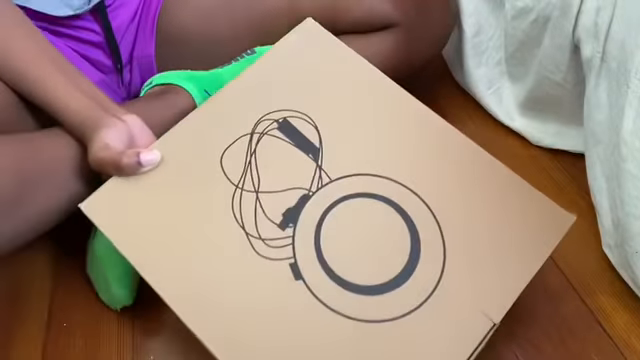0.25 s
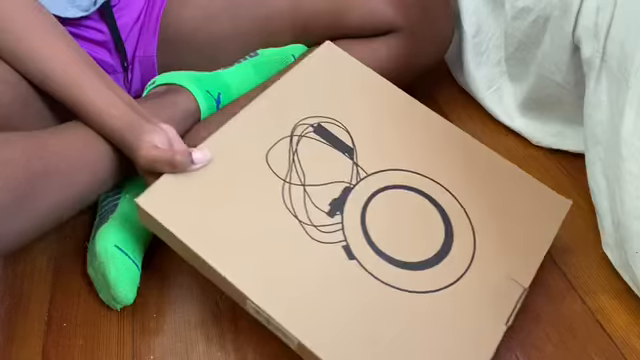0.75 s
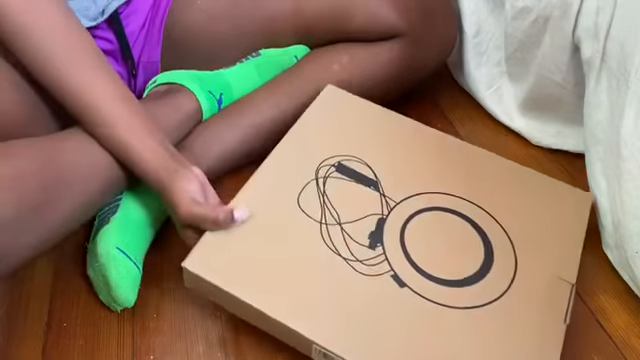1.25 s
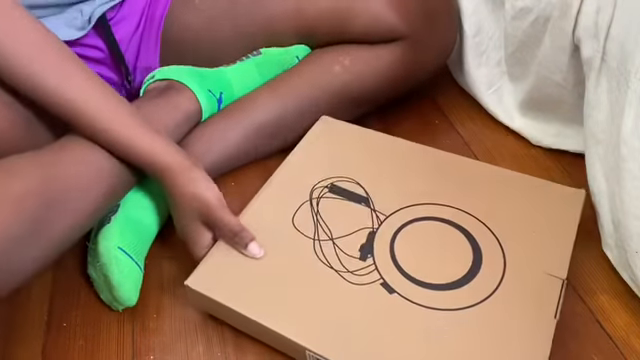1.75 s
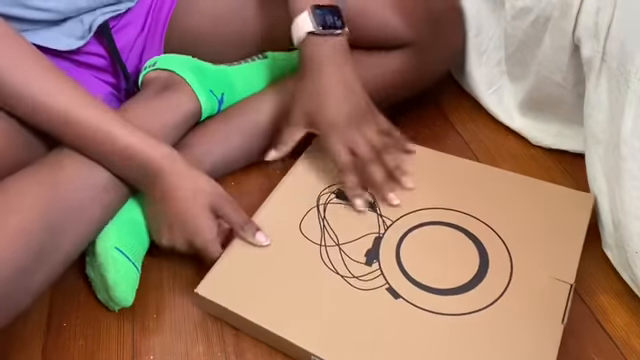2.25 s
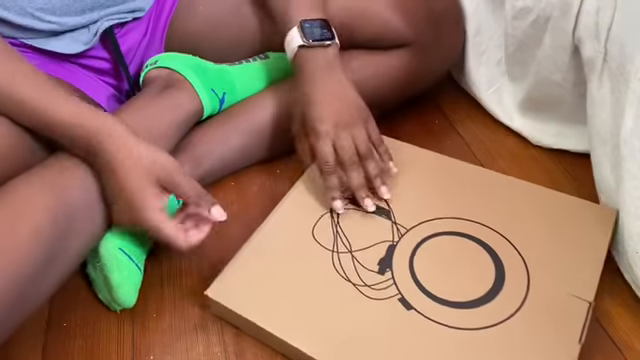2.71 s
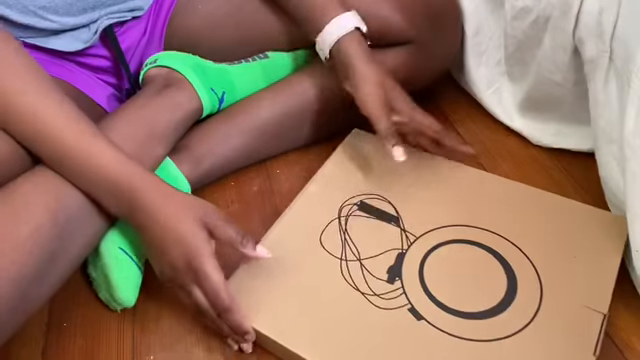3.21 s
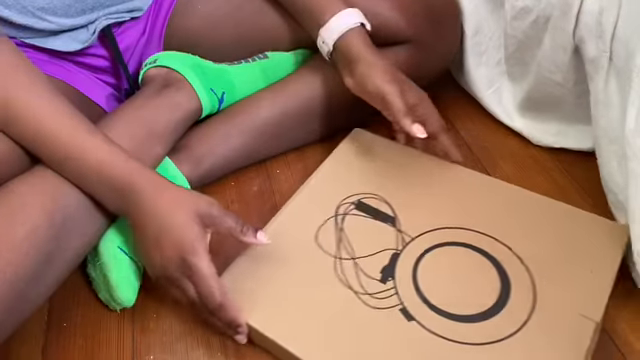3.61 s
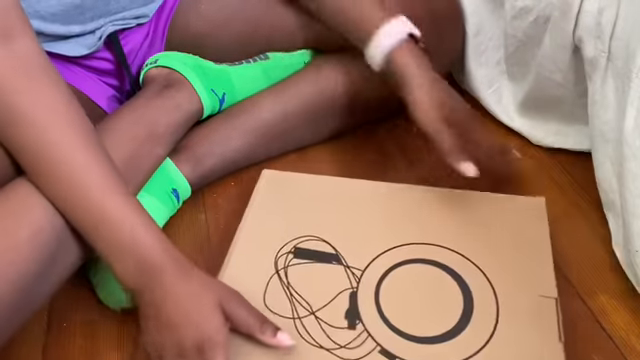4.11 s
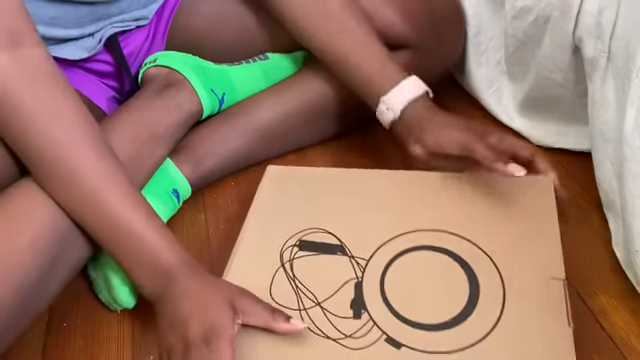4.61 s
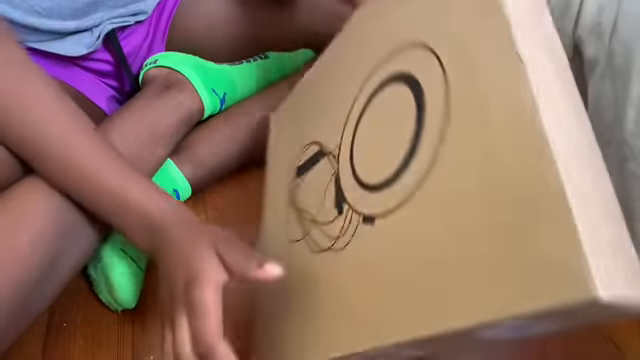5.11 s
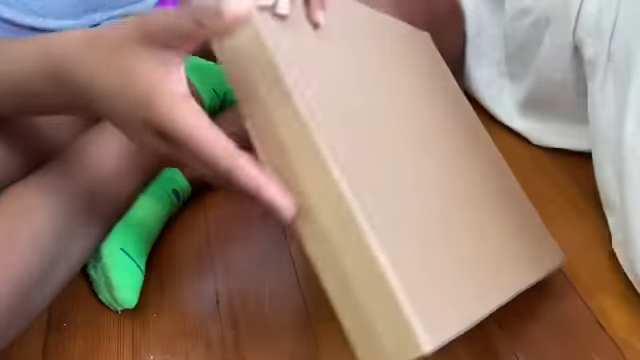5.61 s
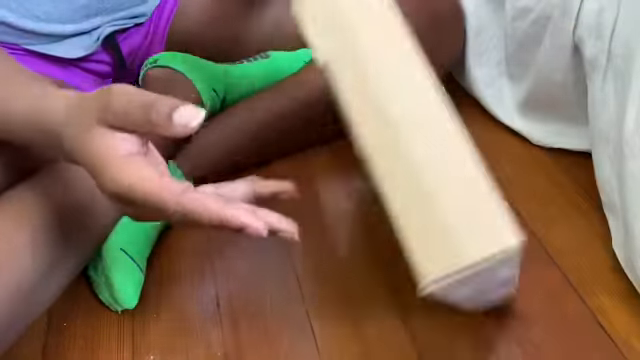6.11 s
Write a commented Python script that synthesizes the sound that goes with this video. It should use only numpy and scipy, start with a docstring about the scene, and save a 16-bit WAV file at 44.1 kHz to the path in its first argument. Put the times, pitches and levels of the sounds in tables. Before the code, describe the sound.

A flat cardboard box bumps down onto a wooden floor, scrapes, slams, gets stroked and pushed round, then tips up with a hard knock.

```python
"""In a small furnished room, a flat cardboard box is lowered onto a wooden floor with dull bumps of its contents.
It is eased along the boards with a scrape, slams down, is stroked in short rubs, then pushed round.
Tipped up on its edge, it knocks, grates and is caught by its rim; last come small rubs and nail ticks.
Ringing modes make the blows, random catches of fibre the rubbing; two microphone ports hear both, with echoes."""
import sys
import numpy as np
from scipy import signal
from scipy.fft import rfft, irfft, next_fast_len
from scipy.io import wavfile
from scipy.ndimage import uniform_filter1d, map_coordinates

SR = 44100
rng = np.random.default_rng(int(sys.argv[2]) if len(sys.argv) > 2 else 0)


def int16_out(signal):
    """Quantize to a 16-bit WAV file."""
    q = np.round(np.clip(np.atleast_2d(signal).T, -1, 1) * 32767)
    wavfile.write(sys.argv[1], SR, q.astype(np.int16))


N = 280035  # samples
BLOW_T = np.arange(SR // 2) / SR  # time axis of one blow, s

# Blow levels are relative: the strongest 10 ms of each.
# dull bumps of contents, palms and floor: t/s, level/dB, relative softness corner f/Hz
THUMPS = [(0.028, -27.5, 168), (0.065, -26, 166), (0.193, -8.5, 194), (0.214, -16.5, 119),
          (0.331, -27, 262), (0.424, -30, 84), (0.5, -19, 114), (0.688, -11.5, 259), (0.701, -11.5, 157),
          (0.712, -13.5, 174), (0.736, -21, 172), (0.772, -19, 154), (0.86, -20, 130), (1.575, -31, 102),
          (1.684, -38.5, 159), (2.078, -41, 287), (2.134, -15, 346), (2.184, -24, 107), (2.356, -30, 360),
          (3.045, -23, 257), (3.537, -27.5, 192), (4.091, -33, 270), (4.178, -26, 233), (4.25, -27, 202),
          (4.265, -21, 158), (4.376, -31, 260), (4.414, -40, 200), (4.511, -25.5, 219), (4.556, -26.5, 202),
          (4.597, -29.5, 168), (4.747, -26, 128), (4.94, -27.5, 156), (5.015, -37, 222), (5.173, -22, 113),
          (5.253, -28.5, 196), (5.582, -25, 175), (6.258, -33.5, 91)]
# edges meeting the floor or a hand: t/s, level/dB, hardness f/Hz, skid/s
KNOCKS = [(0.196, -23, 397, 0.025), (0.502, -34.5, 960, 0.013), (0.649, -33, 524, 0.021),
          (0.686, -24.5, 1290, 0.0036), (0.7, -25, 1190, 0.0095), (0.714, -29.5, 1000, 0.013),
          (0.7705, -29.5, 1290, 0.0013), (0.842, -42, 1090, 0.0018), (0.858, -25.5, 1360, 0.0012),
          (0.866, -23.5, 685, 0.014), (0.876, -33.5, 890, 0.015), (0.991, -36, 760, 0.0036),
          (1.196, -38.5, 1020, 0.0075), (1.263, -35, 870, 0.001), (1.573, -36, 930, 0.016),
          (1.592, -37, 830, 0.012), (1.683, -37, 860, 0.0018), (2.352, -37.5, 945, 0.0017),
          (2.394, -30, 1010, 0.00051), (2.416, -34, 1280, 0.0076), (2.523, -36.5, 854, 0.0041),
          (2.541, -34.5, 1525, 0.005), (2.712, -36, 1190, 0.0073), (2.748, -31, 1493, 0.0024),
          (2.758, -33.5, 1280, 0.0096), (3.044, -31.5, 800, 0.0079), (3.53, -24.5, 680, 0.0013),
          (3.718, -31, 1160, 0.027), (3.96, -33.5, 760, 0.012), (3.999, -38.5, 990, .006),
          (4.158, -35, 670, 0.0061), (4.176, -43, 905, 0.0074), (4.292, -40.5, 1190, 0.0018),
          (4.369, -36, 830, 0.0075), (4.591, -31, 1360, 0.0012), (4.72, -27.5, 600, 0.0099),
          (4.8, -36, 1800, 0.0015), (4.851, -32, 1340, 0.015), (4.885, -37, 1160, 0.028),
          (5.051, -32.5, 1250, 0.0086), (5.104, -35.5, 1510, .002), (5.474, -40.5, 970, 0.0067),
          (6.165, -47.5, 1900, 0.011), (6.236, -36, 1170, 0.038), (6.311, -50, 1050, 0.0076)]
# the box landing with its whole weight: t/s, level/dB, point of contact, skid/s
SLAMS = [(2.0785, -21.5, "base", 0.002), (2.079, -15.5, "edge", 0.0018), (2.086, -14.5, "edge", 0.014),
         (2.1336, -5.5, "base", 0.0037), (2.139, -15.5, "base", 0.0031), (2.149, -22.5, "base", 0.0076),
         (5.136, -24.5, "side", 0.0066), (5.1409, -10, "corner", 0.005), (5.152, -25, "corner", 0.0143),
         (5.251, -21, "side", 0.0084), (5.275, -24, "corner", 0.0049), (5.2834, -21, "side", 0.0073),
         (5.291, -26, "side", 0.01)]
# fingernails and crisp card edges: t/s, level/dB, ring f/Hz, ring against crack/dB
TICKS = [(0.023, -32.5, 3200, -21), (0.064, -32, 3395, -26), (0.191, -32, 3290, -15.5),
         (0.33, -30, 3300, -12.5), (0.683, -39, 3560, 2), (0.77, -36, 3700, -6), (0.858, -39, 3000, -1),
         (2.089, -32.5, 5730, -14), (2.353, -35, 3400, -2), (2.747, -37, 4000, -18.5),
         (4.366, -38.5, 8350, -9), (4.403, -42.5, 8600, -1), (5.142, -29, 7160, -4.5),
         (5.247, -28.5, 7940, -7), (5.254, -32, 5400, -3), (5.707, -32.5, 7400, -5),
         (6.102, -29.5, 4930, 3.5), (6.159, -34, 7000, -20), (6.194, -41, 4600, -14),
         (6.237, -39.5, 4640, -3.5)]
# fingertips catching the upright box by its rim: t/s, level/dB
RIM_CATCHES = [(5.58, -28), (5.707, -32), (6.028, -40)]
# modes of the rim: f/Hz, level/dB, t60/s
RIM_MODES = [(810, -6, 0.11), (1766, 8, 0.028), (1964, -7, 0.068), (2970, -1, 0.031)]
# modes of the box's hollow and panels: f/Hz
BOX_HZ = [72, 119, 175, 238, 285, 393, 490, 700, 862, 985, 1141, 1233, 1450, 1710, 1845, 2140, 2558, 3134,
          3600, 4000]
# width of each mode at its usual loss: width/Hz
BOX_WIDTH_HZ = [10.8, 26, 24.3, 50, 81, 55, 95, 68, 45, 71, 66, 34, 142, 77, 91, 94, 60, 260, 180, 270]
# how strongly each mode sounds, by point of contact: level/dB
BOX_MODE_DB = { "lid": [-2, -2, 1, 3.5, 2.5, 7.5, 3, 9, -4, 5.5, -1.5, 6, -1.5, 2.5, 1.5, 8, 4.5, 1, 6.5,
               -14.5], "edge": [-17.5, -2.5, -13.5, -2.5, 1.5, -7.5, -3.5, -1, 2, -3, 2.5, -5, -8.5, 4, 4.5,
               1.5, 0, -11, -8.5, -18], "base": [1.5, -4, -4.5, -3.5, -4, 2.5, -3, 7, 7, -3, -13.5, 2, -7.5,
               -15, -11, -25.5, -37.5, -36.5, -41, -45], "corner": [-27, -9, -3, -11.5, -14, 0, -7, -3, 0,
               -1, -6.5, 7, 1.5, -4, -3, 5, -4.5, -4, -9.5, -7.5], "side": [-20, -15, -2.5, 1.5, -5.5, -6,
               -14, -2, 4, 4.5, -5.5, 0, -10.5, -7.5, -12.5, -6, -14, -17, -23.5, -15]}

# the box eased onto the floor: t/s, relative scrape of card on wood/dB, relative hiss of skin on card/dB
EASE_SLIDE = [(0.96, -28.5, -46), (1.0, -41.5, -50), (1.17, -46.5, -50), (1.21, -38, -50.5),
              (1.3, -45, -44), (1.37, -40, -46), (1.42, -47.5, -51.5), (1.45, -45.5, -43),
              (1.54, -44, -38.5), (1.62, -45.5, -51.5), (1.89, -46, -49), (2.04, -52, -67)]
# the box pushed round, same columns: t/s, relative scrape/dB, relative hiss/dB
PUSH_SLIDE = [(3.44, -47, -66), (3.56, -38.5, -41.5), (3.675, -30, -31), (3.801, -38.5, -44.5),
              (3.98, -37.5, -42.5), (4.14, -46.5, -52.5), (4.182, -36, -40.5), (4.31, -39, -49.5),
              (4.37, -36.5, -47), (4.43, -44, -57), (4.48, -41, -49.5), (4.55, -35, -43.5),
              (4.66, -39.5, -45.5), (4.703, -35.5, -37), (4.94, -36.5, -42), (5.12, -39.5, -44),
              (5.34, -41.5, -52), (5.46, -60, -62)]
# short rubs as hands shift the box or stroke its lid: start t/s, length/s, scrape level/dB, hiss level/dB
RUBS = [(0.0, 0.0061, -36.5, -47), (0.176, 0.034, -38, -61), (0.322, 0.014, -44, -64),
        (0.421, 0.12, -44, -50.5), (0.513, 0.234, -52, -49.5), (0.638, 0.29, -47, -53),
        (2.221, 0.066, -41, -47), (2.31, 0.28, -37, -42.5), (2.601, 0.17, -39, -47.5),
        (2.896, 0.11, -78, -56.5), (3.03, 0.03, -43.5, -50), (3.148, 0.14, -39, -47.5),
        (3.332, 0.091, -48.5, -86), (5.466, 0.015, -44, -52), (5.475, 0.22, -47, -50.5),
        (5.728, 0.11, -38, -48.5), (5.839, 0.085, -35.5, -46), (5.907, 0.14, -41, -47),
        (6.108, 0.097, -60.5, -56), (6.228, 0.022, -40.5, -39.5), (6.288, 0.028, -43.5, -46.5)]
# palms brushing the lid as it is caught or let go: start t/s, length/s, level/dB
BRUSHES = [(0.01, 0.082, -44), (0.175, 0.019, -34), (0.308, 0.038, -41), (0.668, 0.021, -25.5),
           (0.84, 0.027, -38), (2.056, 0.056, -28), (2.106, 0.034, -38.5), (5.219, 0.024, -31.5),
           (5.26, 0.011, -36), (5.562, 0.019, -33)]
# stick-slip of a dragged edge, shudder to faint squeak: middle t/s, level/dB, half length/s, mean slip rate f/Hz
SLIPS = [(1.995, -54, .065, 1740), (3.945, -31, .02, 60), (4.045, -35, .095, 59)]
# hands taking the weight and bending the panels: start t/s, length/s, relative level/dB
GRIPS = [(0.0, 0.59, -40.5), (0.651, 0.18, -35), (0.829, 0.079, -35), (2.059, 0.19, -37.5),
         (3.908, 0.62, -45.5), (4.913, 0.49, -47), (5.963, 0.22, -54)]

# colour of card scraping on wood: f/Hz, level/dB per Hz
SCRAPE_COLOUR = [(100, -5.5), (220, -4.5), (400, 3.5), (560, -6), (730, 5.5), (1000, -2.5), (1500, -5.5),
                 (2200, -11.5), (4000, -30), (8000, -58)]
# colour of the rasp shared by card and skin: f/Hz, level/dB per Hz
RASP_COLOUR = [(700, -28), (1500, -7.5), (2600, -3.5), (3400, -5), (4400, -4), (6000, -17.5),
               (10000, -67.5)]
# colour of skin hissing on card: f/Hz, level/dB per Hz
HISS_COLOUR = [(1500, -18), (3500, -3), (5500, -1), (8000, 0), (11000, -2.5), (14300, -3), (15100, -22)]
# colour of an edge snagging on the grain: f/Hz, level/dB per Hz
SNAG_COLOUR = [(300, -7.5), (1400, -2.5), (4500, -31), (10000, -42)]
# colour of bending panels: f/Hz, level/dB per Hz
RUMBLE_COLOUR = [(20, -30), (40, 0), (60, -2), (90, 0.5), (180, -11), (300, -15), (600, -40.5)]

# decay of the room's tail: f/Hz, t60/s
ROOM_T60 = [(70, 0.18), (300, 0.2), (1500, 0.18), (5000, 0.18), (14000, 0.015)]
# left-right correlation of scattered sound at the ports: f/Hz, correlation
PORT_LIKENESS = [(80, 0.7), (200, 0.8), (500, 0), (3000, 0)]
# arrival of direct sound at the left port after the right: f/Hz, lag/s
PORT_LAG = [(300, .0001), (2300, .00013), (4500, -.000136), (15000, -.000136)]
# left port minus right: f/Hz, level/dB
PORT_BALANCE = [(150, 0), (400, -4), (1000, -2), (3000, -1.5), (9000, -.5)]

HELD_UNTIL_S, HELD_LOSS = 0.75, 0.6  # held clear of the floor, the box has this share of its usual loss
UPRIGHT_S, TIPPING_S = 5.2, 0.4  # the box starts to stand on its narrow side, and the length of that turn
FIRST_BLOW = 2.3  # a short contact's first blow against its chatter
SWELL_SHARE = 0.31  # swell of a short rub, as a share of its length
RELEASE_DB_PER_S = 246.5  # fall when a hand stops


def box_ring(place, loss=1):
    """The box's answer to one sharp tap at a point of contact; with less loss its modes ring longer."""
    ring = 0
    for k, (hz, width, db) in enumerate(zip(BOX_HZ, BOX_WIDTH_HZ, BOX_MODE_DB[place])):
        decay = np.exp(-np.pi * loss * width * BLOW_T)
        ring = ring + (-1) ** k * amp(db) * width * decay * np.cos(2 * np.pi * hz * BLOW_T)
    return ring


def contact_force(skid):
    """A first blow, then chatter for as long as the contact skids."""
    force = rng.standard_normal(len(BLOW_T)) * np.exp(-(BLOW_T / skid) ** 4)
    force /= np.linalg.norm(force)
    force[0] += FIRST_BLOW * np.exp(-skid / 0.011)  # a short contact is nearly all one blow
    return force


def ring_panels(force, ring):
    """The box's modes, at unit energy, driven by a contact force."""
    return signal.fftconvolve(force, ring / np.linalg.norm(ring))[:len(BLOW_T)]


def slams(crack_db=-13, crack_hz=2800):
    """A heavy landing rings the modes of the part that hits, with a dry crack of card."""
    out = np.zeros((2, N))
    for s, db, place, skid in SLAMS:
        force = contact_force(skid)
        panels = ring_panels(force, box_ring(place))
        crack = amp(crack_db) * filtered(force, lambda f: 1 / (1 + 1j * f / crack_hz))
        add(out, s, db, in_room(panels + crack, near_db=-1.5, room_db=-15.5, near_t60=0.011))
    return out


def thumps(ring, gain_db=-2, damping=0.71):
    """A soft push builds slowly and reaches mainly the hollow and the lowest panel modes."""
    out = np.zeros((2, N))
    held = box_ring("lid", HELD_LOSS)
    for s, db, corner_hz in THUMPS:
        body = held if s < HELD_UNTIL_S else ring
        push = filtered(body, lambda f: lowpass(f, 0.87 * corner_hz, damping) * lowpass(f, 590, 1.88))
        start = s - .5 / corner_hz  # leaves time for the push to build
        add(out, start, db + gain_db, in_room(push, near_db=-3, room_db=-10.5))
    return out


def knocks(ring, card_db=2, bass_cut=0.28):
    """An edge lands, then chatters while it skids; harder contact rings higher panel modes."""
    out = np.zeros((2, N))
    for s, db, hard_hz, skid in KNOCKS:
        force = contact_force(skid)
        # the card round the contact speaks at once, the whole panels ring on
        body = amp(card_db) * force + ring_panels(force, ring)
        contact = lambda f: 1j * f * lowpass(f, hard_hz, 0.62) * lowpass(f, 2.16 * hard_hz, 3.4)
        # a small patch of card moves little air in the bass
        radiation = lambda f: 1j * f / (1j * f + bass_cut * hard_hz)
        knock = filtered(body, lambda f: contact(f) * radiation(f))
        add(out, s, db, in_room(knock, near_db=-2.5, room_db=-12))
    return out


def rim_catches(crack_db=-4, crack_t60=0.014):
    """Fingertips stop the tipping box by its rim, which snaps and rings briefly."""
    out = np.zeros((2, N))
    rim = sum(amp(db - 60 * BLOW_T / t60) * np.sin(2 * np.pi * hz * BLOW_T) for hz, db, t60 in RIM_MODES)
    for s, db in RIM_CATCHES:
        crack = filtered(fading_noise(crack_t60), lambda f: lowpass(f, 2400, 1))
        add(out, s, db, in_room(unit(rim) + amp(crack_db) * unit(crack), near_db=-8, room_db=-14))
    return out


def ticks(crack_t60=0.013, nail_t60=0.011):
    """A nail's crack is too short and light to move the panels; only a small part rings with it."""
    out = np.zeros((2, N))
    for s, db, ring_hz, ring_db in TICKS:
        colour = lambda f: f ** 2 * lowpass(f, .5 * ring_hz, 1.2) * lowpass(f, 12000, 1.3)
        crack = filtered(fading_noise(crack_t60), colour)
        ping = np.sin(2 * np.pi * ring_hz * BLOW_T) * amp(-60 * BLOW_T / nail_t60)
        tick = unit(crack) + amp(ring_db) * unit(ping)
        add(out, s, db, in_room(tick, near_db=-10, room_db=-19, near_t60=.04))
    return out


def friction(spectrum, catches_per_s, grit, catch_s, scatter_db):
    """Fibres catch and let go at random, each a tiny burst over a bed of finer rubbing."""
    catches = (rng.random(N) < catches_per_s / SR) * rng.rayleigh(.7, size=N)
    bursts = 1 + grit * signal.lfilter([1], [1, -np.exp(-1 / (catch_s * SR))], catches)
    noise = bursts * rng.standard_normal((3, N))
    direct, a, b = filtered(noise, lambda f: amp(along(spectrum, f)))
    return unit(at_ports(direct, amp(scatter_db) * a, amp(scatter_db) * b))


def shifting(x):
    """As the contact points wander, different panel resonances stand out for a moment."""
    z = signal.stft(x, nperseg=1024)[2]
    field = uniform_filter1d(rng.standard_normal(z.shape[1:]), size=3, axis=0)  # smooth over frequency
    field = uniform_filter1d(field, size=5, axis=1)  # and over time
    depth_db = 2.7
    return unit(signal.istft(z * amp(depth_db * unit(field)), nperseg=1024)[1][:, :N])


def gesture(start, length, attack):
    """Gain of one hand movement: it swells, holds and dies away."""
    age = np.maximum(np.arange(N) / SR - start, 0)
    return (1 - np.exp(-(age / attack) ** 2)) * amp(-RELEASE_DB_PER_S * np.maximum(age - length, 0))


def rubbing(slide_scrape_db=1.0, slide_hiss_db=-1.83, slide_attack_s=0.021, resting_db=-68):
    """Levels of scrape and hiss in dB: long slides, short rubs and hands that are never quite still."""
    power = np.full((2, N), amp(resting_db) ** 2)
    for slide in (EASE_SLIDE, PUSH_SLIDE):
        start, end = slide[0][0], slide[-1][0]
        levels = np.array(curves(slide)) + [[slide_scrape_db], [slide_hiss_db]]
        power += (amp(levels) * gesture(start, end - start, slide_attack_s)) ** 2
    for start, length, scrape_db, hiss_db in RUBS:
        rub = gesture(start, length, SWELL_SHARE * length)
        power += (amp([[scrape_db], [hiss_db]]) * rub) ** 2
    return 10 * np.log10(power)


def scraping(ring, panel_db=-8, upright_db=3.0, free_card_db=-7):
    """Lying flat, the box rubs broadly; stood up, it grates coarsely and its free panels ring."""
    through = lambda x, modes: unit(signal.fftconvolve(x, modes[None], axes=1)[:, :N])
    rub = friction(SCRAPE_COLOUR, catches_per_s=100, grit=1.7, catch_s=0.0012, scatter_db=0.5)
    flat = unit(rub + amp(panel_db) * through(rub, ring))
    coarse = [(100, -2.0), (1000, -1), (6000, -8)]  # f/Hz, level/dB per Hz
    grate = friction(coarse, catches_per_s=130, grit=2.45, catch_s=0.00085, scatter_db=2.0)
    stood = unit(through(grate, box_ring("side")) + amp(free_card_db) * rub)
    upright = np.clip((np.arange(N) / SR - UPRIGHT_S) / TIPPING_S, 0, 1)
    return shifting(np.sqrt(1 - upright) * flat + amp(upright_db) * np.sqrt(upright) * stood)


def sliding(ring, drag_db, stroke_db, rasp_db=-3, judder_db=0.89):
    """Card drags unevenly over the boards and sounds the panels; palms hiss over the lid."""
    judder = judder_db * wobble(45)
    scrape = amp(drag_db + judder) * scraping(ring)
    # both kinds of rubbing share the rasp between them
    rasp_level = amp((drag_db + stroke_db) / 2 + rasp_db + 0.75 * judder)
    rasp = friction(RASP_COLOUR, catches_per_s=260, grit=0.87, catch_s=0.0038, scatter_db=31)
    skin = friction(HISS_COLOUR, catches_per_s=140, grit=0.4, catch_s=0.002, scatter_db=-6.5)
    return scrape + rasp_level * shifting(rasp) + amp(stroke_db + judder) * skin


def snagging(drag_db, snag_db=-11):
    """A dragged edge snags on the grain of the boards many times a second, a rough crackle."""
    snags = friction(SNAG_COLOUR, catches_per_s=70, grit=14, catch_s=0.0017, scatter_db=-7.5)
    return amp(drag_db + snag_db) * snags


def slipping():
    """An edge sticks and lets go at a nearly steady rate."""
    t = np.arange(N) / SR
    out = np.zeros(N)
    for s, db, half, hz in SLIPS:
        phase = 2 * np.pi * np.cumsum(hz * (1 + .065 * wobble(600))) / SR
        level = amp(db + 2 * wobble(70)) * np.exp(-((t - s) / half) ** 4)
        out += level * unit(np.sin(phase))
    return np.array([out, out])


def brushing(attack_s=0.021):
    """Each quick sweep of a palm swells and fades."""
    sweep = sum(amp(db) * gesture(start, length, attack_s) for start, length, db in BRUSHES)
    # f/Hz, level/dB per Hz
    skin = [(500, 6.0), (1500, 3.5), (3500, -2.0), (6000, -7.0), (9000, -11.5), (14000, -14.5), (15500, -51.5)]
    return sweep * friction(skin, catches_per_s=1000, grit=0.13, catch_s=0.00027, scatter_db=3.5)


def flexing(drag_db, flex_db=-1, dragged_db=-13, lumps_db=2, attack_s=0.0071):
    """The broad panels bend and rumble while they are gripped, and a little whenever the box drags."""
    bend = sum(amp(db) * gesture(start, length, attack_s) for start, length, db in GRIPS)
    level = np.hypot(bend, amp(drag_db + dragged_db))
    rumble = friction(RUMBLE_COLOUR, catches_per_s=35, grit=1, catch_s=0.0018, scatter_db=2.0)
    return level * amp(flex_db + lumps_db * wobble(38)) * rumble


def room_tone(level_db=-63):
    """The faint, dark hush of the room: steady coloured noise, independent at the two ports."""
    # f/Hz, level/dB per Hz
    hush = [(25, -22.5), (100, 17.0), (400, -4.0), (1500, -40), (5000, -61), (15000, -35.0)]
    return amp(level_db) * unit(filtered(rng.standard_normal((2, N)), lambda f: amp(along(hush, f))))


def in_room(x, near_db, room_db, near_t60=0.076):
    """Direct sound, quick echoes off floor and legs, and the room's tail."""
    hz, t, z = signal.stft(rng.standard_normal((2, len(BLOW_T))), SR, nperseg=256)
    fade = amp(-60 * t / along(ROOM_T60, hz)[:, None])
    tail = signal.istft(z * fade, SR, nperseg=256)[1][:, :len(BLOW_T)]
    near = rng.standard_normal(tail.shape) * amp(-60 * BLOW_T / near_t60)
    echoes = (amp(near_db) * unit(near) + amp(room_db) * unit(tail)) / np.sqrt(len(BLOW_T))
    return at_ports(x, *signal.fftconvolve(x[None], echoes, axes=1)[:, :len(x)])


def at_ports(direct, a, b):
    """Direct sound reaches one microphone port first; scattered sound (a, b) is alike only in the bass."""
    turn = lambda f: np.arccos(np.clip(along(PORT_LIKENESS, f), -1, 1)) / 2
    mid, side = filtered(np.array([a, b]), lambda f: np.array([np.cos(turn(f)), np.sin(turn(f))]))
    ports = np.array([[.5], [-.5]])  # left, right: each takes half the lag and balance
    pair = filtered(direct, lambda f: np.exp(-2j * np.pi * f * ports * along(PORT_LAG, f)))
    heard = pair + np.array([mid + side, mid - side])
    return filtered(heard, lambda f: amp(ports * along(PORT_BALANCE, f)))


def add(track, s, db, sound):
    """Mix in one blow, its strongest 10 ms at the given level."""
    power = uniform_filter1d(np.mean(sound ** 2, axis=0), size=441).max()
    part = track[:, max(round(s * SR), 0):][:, :len(BLOW_T)]
    part += amp(db) * sound[:, :part.shape[1]] / np.sqrt(power)


def amp(db):
    """Decibels to gain."""
    return 10 ** (np.asarray(db) / 20)


def unit(x):
    """Scaled to rms 1."""
    return x / np.sqrt(np.mean(x ** 2) + 1e-20)


def fading_noise(t60):
    """Noise the length of one blow that falls 60 dB in t60 seconds."""
    return rng.standard_normal(len(BLOW_T)) * amp(-60 * BLOW_T / t60)


def along(points, hz):
    """(f/Hz, value) points read on a log frequency axis."""
    f, v = np.transpose(points)
    return np.interp(np.log(hz + 1), np.log(f + 1), v)


def curves(rows):
    """One value per sample for each column after the time."""
    s, *cols = np.transpose(rows)
    return [np.interp(np.arange(N) / SR, s, c) for c in cols]


def wobble(rate):
    """A smooth random curve, rate knots a second."""
    knots = rng.standard_normal(int(N * rate / SR) + 4)
    return map_coordinates(knots, [np.arange(N) * rate / SR])


def filtered(x, response):
    """The sound x shaped by a complex response of frequency."""
    n = x.shape[-1]
    m = next_fast_len(n + 4096, True)
    return irfft(rfft(x, m) * response(np.fft.rfftfreq(m, 1 / SR)), m)[..., :n]


def lowpass(hz, corner_hz, damping):
    """A mass on a spring: level well below its corner, falling above."""
    return 1 / (1 - (hz / corner_hz) ** 2 + 1j * damping * hz / corner_hz)


def scene():
    """The box's blows and rubbing, its bending panels, and the room behind them."""
    ring = box_ring("lid")
    drag_db, stroke_db = rubbing()
    blows = slams() + thumps(ring) + knocks(ring) + rim_catches() + ticks()
    rubs = sliding(ring, drag_db, stroke_db) + snagging(drag_db) + slipping() + brushing()
    return blows + rubs + flexing(drag_db) + room_tone()


def record(dry):
    """The recorder clips at full scale and keeps nothing above its band limit."""
    top_hz = 15000
    return filtered(np.clip(dry, -1, 1), lambda hz: hz < top_hz)


dry = scene()
out = record(dry)
int16_out(out)
```